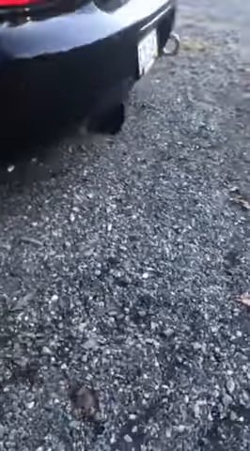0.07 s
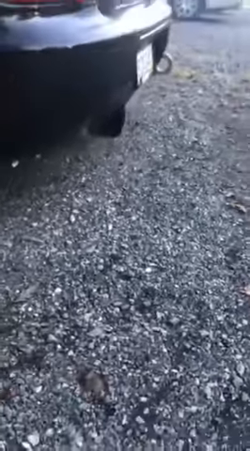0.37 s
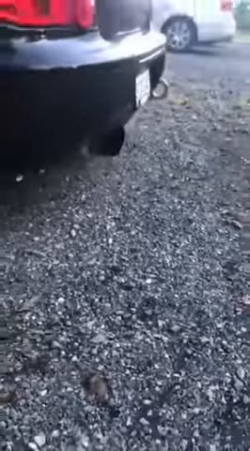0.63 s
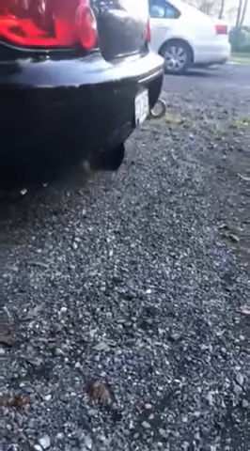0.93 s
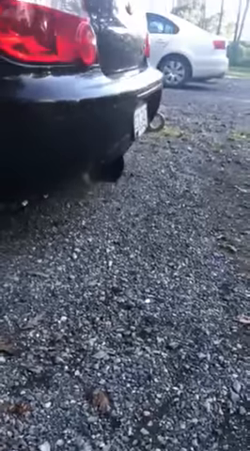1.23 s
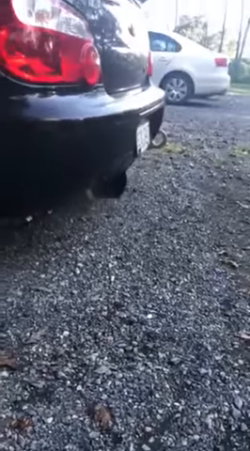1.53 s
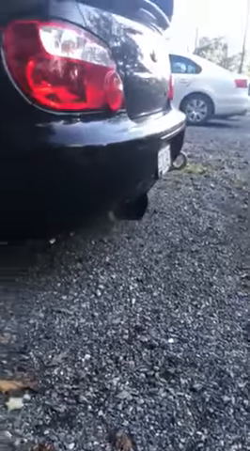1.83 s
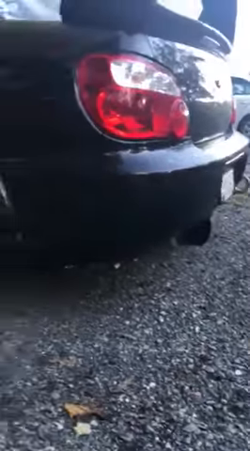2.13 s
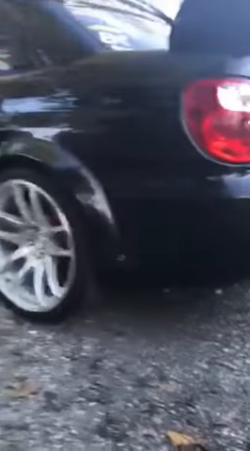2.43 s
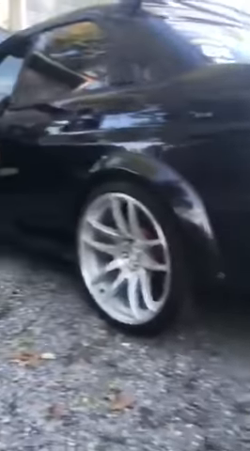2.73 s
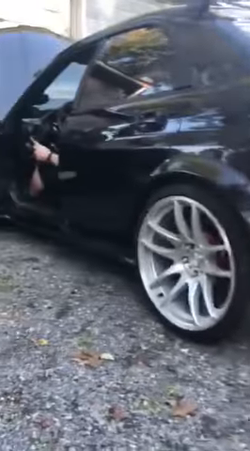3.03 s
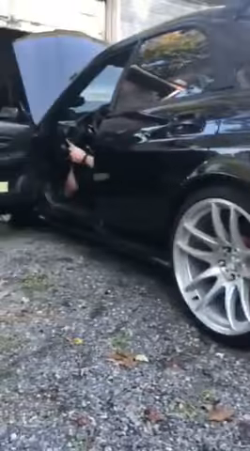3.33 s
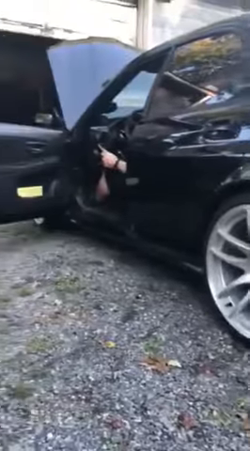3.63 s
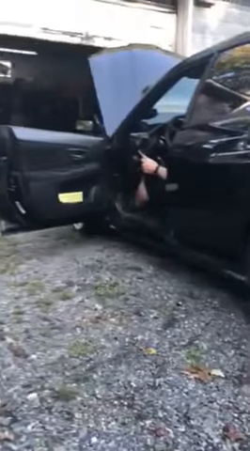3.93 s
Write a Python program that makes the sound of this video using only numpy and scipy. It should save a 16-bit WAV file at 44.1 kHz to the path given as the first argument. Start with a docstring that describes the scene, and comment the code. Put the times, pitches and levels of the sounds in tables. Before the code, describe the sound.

A car engine idles with a low, slightly uneven exhaust rumble and small pops.

```python
"""A four-cylinder car idles outdoors over a steady engine whirr. At first we stand behind the tailpipe:
each firing thumps through the exhaust with a puff of hiss, and the pipe spits and pops.
From 1.6 s we walk round the car. Soon the idle gets rougher: weak or late firings make it stumble,
and the silencer gives low gulps. From about 2.7 s we listen beside the rear wheel,
where the hiss is softer and the stumbles, spits and a few quieter pops carry on."""
import sys
import numpy as np
from scipy import signal
from scipy.fft import rfft, irfft, next_fast_len
from scipy.io import wavfile

SR = 44100
rng = np.random.default_rng(int(sys.argv[2]) if len(sys.argv) > 2 else 0)


def wrap_up_sound(samples):
    """Save the sound to the file named by the first command line argument, as 16-bit audio."""
    columns = np.atleast_2d(samples).T
    # keep every value between -1 and 1, then stretch to whole-number steps
    tamed = np.clip(columns, -1, 1)
    steps = np.round(tamed * 32767).astype(np.int16)
    wavfile.write(sys.argv[1], SR, steps)


N = 176400

# How fast the engine fires: time_s, rate_hz
FIRING_RATE = [(0.0, 44.39), (0.22, 45.12), (0.42, 44.57), (0.68, 45.86), (0.95, 45.3), (1.25, 44.26),
               (1.55, 44.88), (1.78, 44.28), (1.98, 42.41), (2.2, 43.86), (2.38, 43.17), (2.5, 42.91),
               (2.75, 43.2), (3.0, 42.47), (3.2, 42.46), (3.42, 43.48), (3.6, 43.5), (4.0, 43.6)]
# The four cylinders in firing order: strength_db, late_s, extra_hiss_db
CYLINDERS = [(.1, .0001, 2.5), (-.5, .00064, 2.6), (.7, -.0003, 4.6), (-.1, -.0004, 5.3)]
# Uneven firings: time_s, strength_change_db, late_s
STUMBLES = [(1.814, -8, 0.018), (1.86, -1, -.001), (1.929, -8, -0.0061), (1.976, -12, 0.025),
            (1.999, -0.5, -.0015), (2.392, 1.5, -.0012), (2.415, -8, -.002), (2.438, -2, .0005),
            (2.786, -5, .0005), (2.833, -2.5, .001), (2.856, 0.5, -.002), (2.88, -1.5, -.0005),
            (2.95, 4, -.0005), (2.997, -5.5, .0005), (3.02, -4.5, .0015), (3.067, -8.5, .0005),
            (3.138, 3, -.0005), (3.209, -4, .002), (3.487, 0, 0.025), (3.51, -9.5, -.002),
            (3.533, 1.5, .001), (3.671, -7, .0003)]
# Random variation grows as the idle gets rougher: time_s, multiplier
ROUGHNESS = [(1.7, 1), (2.8, 1.9)]
# Volume controls for three layers: time_s, exhaust_gain_db, gas_gain_db, whirr_gain_db
LAYER_GAINS = [(0, -14, -42.5, -26), (.4, -15, -47.5, -27.5), (.9, -15, -48, -28.5), (1.6, -17, -50, -29.5),
               (2.4, -15.5, -49, -31), (3.1, -17, -51.5, -31.5), (4, -18, -53.5, -30.5)]

# Tone of the engine noise at the start, behind the car and beside it: pitch_hz, gain_db
WHIRR_START = [(25, 9), (120, 29.5), (300, 12), (480, 4), (700, 1), (1000, -5), (1450, -10), (2000, -8.5),
               (2700, -21.5), (3400, -18), (5000, -24.5), (9000, -26)]
WHIRR_BEHIND = [(25, 17), (120, 22.5), (300, 10.5), (520, -3.5), (630, -3.5), (850, -9.5), (1200, -11),
                (1450, -6), (1680, -5), (1900, -13.5), (2300, -19), (2800, -18), (3400, -29), (4200, -23.5),
                (5000, -31), (9000, -33.5)]
WHIRR_BESIDE = [(25, 8.5), (120, 30), (300, 12.5), (520, 3), (650, 2), (850, -0.5), (1200, -7), (1500, -3),
                (1900, -11.5), (2700, -16), (3400, -26), (5000, -24.5), (9000, -29.5)]
# Dips in the tone of the whirr: pitch_hz, width_hz, depth_db
WHIRR_DIPS = [(620, 50, -9), (1910, 60, -7)]
# The whirr thins out in the bass: pitch_hz, gain_db
BASS_CUT = [(30, -14), (90, -10), (130, -10), (200, -5.5), (450, 0)]
# Engine ringing, whose two levels are weighted in whirr(): pitch_hz, width_hz, behind_db, beside_db
ENGINE_RINGS = [(537, 10, -19, -17), (1398, 7, -17.5, -22), (1460, 14, -23, -16.5), (1535, 8, -20.5, -22),
                (1625, 8, -18.5, -28)]
# Lowest pitch that the ground echo partly cancels: time_s, pitch_hz
GROUND_NOTCH = [(0, 484), (.3, 550), (.6, 630), (2.4, 642), (4, 726)]
# Clean overtones of the firing rate: multiple, level_db
OVERTONES = [(7, -42), (9, -38), (12, -46)]
# Fade added to those overtones: time_s, gain_db
OVERTONE_FADE = [(0, -2), (1.2, -1), (1.8, -7.5), (2.5, -14)]
# Tone of the light tick between firings: pitch_hz, gain_db
TICK_TONE = [(1200, -24.5), (2000, -2.5), (2500, -6), (3000, -4), (3500, -22), (9000, -25.5)]
# Loudness of the ticking: time_s, level_db
TICK_LEVEL = [(0, -50), (1.2, -50), (2.5, -57), (4, -62)]

# Silencer gulps, gas spits and pipe pops: start_s, strength_db
GULPS = [(1.93, -14), (1.97, -13), (2.41, -23), (3.205, -15.5), (3.489, -10.5), (3.519, -13.5)]
SPITS = [(0.0562, -26), (0.1448, -25), (0.1661, -24), (0.2547, -25), (0.2786, -25), (0.3896, -26),
         (0.4582, -26), (0.501, -25), (0.5227, -26), (0.6984, -27), (0.7864, -26), (0.8514, -22),
         (0.8739, -25), (1.2307, -27), (1.4097, -26), (1.4993, -26), (1.7456, -28), (1.8369, -28),
         (1.8592, -28), (1.9072, -28), (1.9522, -27), (2.1159, -27), (2.277, -27), (2.347, -29),
         (2.3683, -27), (2.4637, -29), (2.4844, -27), (2.764, -28), (2.8795, -30), (2.9272, -23),
         (2.9496, -32), (2.9742, -32), (3.1618, -33), (3.5551, -31)]
POPS = [(0.0345, -15), (0.3215, -19), (0.39, -18), (0.965, -25), (1.1395, -16.5), (1.41, -15.5),
        (2.838, -25), (3.373, -26), (3.764, -24)]
# Tone of a spit, its bright tail and the tail of a pop: pitch_hz, gain_db
SPIT_TONE = [(800, -14), (1900, 6), (2300, 15.5), (2900, 13.5), (3400, -6), (4200, 4), (5000, -15),
             (6800, -14), (8500, -7.5), (9500, -20)]
SIZZLE_TONE = [(3000, -18), (4300, -2), (6300, -3.5), (8800, -5)]
POP_TAIL_TONE = [(150, -26.5), (400, -15), (600, 0.5), (900, -1), (1300, -14), (2000, -9), (3500, -17.5),
                 (9000, -23)]
# Tone of the low, middle and high gas noise of a firing: pitch_hz, gain_db
CHUFF_TONE = [(100, -7), (220, 3), (330, 4.5), (450, -11.5), (620, -30.5), (1000, -26.5), (2000, -34),
              (5000, -66.5)]
RASP_TONE = [(400, -28), (800, 5.5), (1500, 9), (1900, -21), (2300, 7), (2900, 5.5), (3400, -13.5),
             (5000, -17.5), (9000, -29.5)]
HISS_TONE = [(1500, -30), (3000, 11.5), (4000, 4), (5000, 1), (6800, 5), (8000, 3), (8700, 7.5),
             (9500, -34.5)]
# Tone of the throaty edge of a firing: pitch_hz, gain_db
BARK_TONE = [(120, -43), (220, 1), (265, 1.5), (312, -1), (355, -5.5), (398, -6), (445, -9.5), (485, -17),
             (532, -10.5), (610, -27.5), (1200, -33.5), (4000, -79)]
# Tone of the exhaust thump from behind and from the side: pitch_hz, gain_db
PIPE_BEHIND = [(5, -71.5), (25, -19), (44, -5), (60, -21), (88, 4.5), (134, 6.5), (178, 4), (222, -27.5),
               (266, -33), (350, -24.5), (620, -45), (4000, -81.5)]
PIPE_BESIDE = [(5, -61), (25, -49.5), (44, -11.5), (62, -15.5), (86, 4), (130, -1.5), (174, 0.5),
               (218, -21), (262, -19), (350, -39.5), (620, -57.5), (4000, -78.5)]

WALK_S = (1.6, 2.73)  # the listener moves from behind the car to its side
WHIRR_BLEND_S = (0.101, 0.601, 1.9, 3.2)  # tone leaves "start", reaches "behind", leaves, reaches "beside"
FIRST_FIRING = .43  # wait before the first firing, as a share of the gap between firings


def amp(db):
    """Turn decibels into a multiplier."""
    return 10 ** (np.asarray(db) / 20)


def unit(x):
    """Scale a sound to an average (rms) level of 1."""
    return x / np.sqrt(np.mean(x ** 2) + 1e-20)


def curves(rows):
    """One value per sample for each column after the time."""
    s, *cols = np.transpose(rows)
    return [np.interp(np.arange(N) / SR, s, c) for c in cols]


def gain(tone, hz):
    """Look up a tone table's multiplier at these pitches."""
    pitch_hz, db = np.transpose(tone)
    return amp(np.interp(np.log(hz + 1), np.log(pitch_hz + 1), db))


def filtered(x, response):
    """Turn each pitch in x up or down by response(hz)."""
    size = 2 * next_fast_len(N)
    return irfft(rfft(x, size) * response(np.fft.rfftfreq(size, 1 / SR)), size)[:N]


def rung(x, tone):
    """Let x ring a hollow body with this tone."""
    def response(hz):
        cepstrum = irfft(np.log(gain(tone, hz)))
        # Folding it in half makes the ringing come after each hit, never before.
        cepstrum[1:len(cepstrum) // 2] *= 2
        cepstrum[len(cepstrum) // 2 + 1:] = 0
        return np.exp(rfft(cepstrum))
    return filtered(x, response)


def noise(tone):
    """Steady noise with this tone, at level 1."""
    return unit(filtered(rng.standard_normal(N), lambda hz: gain(tone, hz)))


def impulses(times, db):
    """A one-sample click at each time."""
    return np.bincount(np.clip(np.round(times * SR).astype(int), 0, N), amp(db), N + 1)[:N]


def placed(shape, times, db):
    """A copy of the shape at each time, peaking at db."""
    return signal.fftconvolve(impulses(times, db), shape / abs(shape).max())[:N]


def swell(t, attack_s, decay_s):
    """A loudness shape that rises and dies away."""
    return (1 - np.exp(-t / attack_s)) * np.exp(-t / decay_s)


def bursts(times, db, tone, attack_s, decay_s):
    """A short burst of noise at each time."""
    t = np.arange(SR // 8) / SR
    return placed(swell(t, attack_s, decay_s), times, db) * noise(tone)


def puffs(times, db, tone, scatter_db, delay_s, attack_s, decay_s):
    """A burst of noise with every firing, each of its own size."""
    sizes_db = db + scatter_db * rng.uniform(-1, 1, len(db))
    return unit(bursts(times + delay_s, sizes_db, tone, attack_s, decay_s))


def beside():
    """How far the walk has got: 0 behind the car, 1 at its side."""
    return np.clip((np.arange(N) / SR - WALK_S[0]) / (WALK_S[1] - WALK_S[0]), 0, 1)


def with_ground_echo(x, strength=.45, cutoff_hz=2500):
    """A duller echo off the gravel makes the sound hollow."""
    n = np.arange(N)
    notch_hz, = curves(GROUND_NOTCH)
    delay_samples = SR / (2 * notch_hz)
    dull = filtered(x, lambda hz: 1 / (1 + (hz / cutoff_hz) ** 4))
    return x + strength * np.interp(n - delay_samples, n, dull)


def whirr():
    """The running engine makes steady noise and rings at a few pitches; the tone shifts as we move."""
    def blend(shares):
        return np.sqrt(np.interp(np.arange(N) / SR, WHIRR_BLEND_S, shares))

    def dips(hz):
        return amp(sum(db * np.exp(-((hz - pitch) / width) ** 2) for pitch, width, db in WHIRR_DIPS))

    later = blend([0, 1, 1, 0]) * noise(WHIRR_BEHIND) + blend([0, 0, 0, 1]) * noise(WHIRR_BESIDE)
    wash = blend([1, 0, 0, 0]) * noise(WHIRR_START) + filtered(later, dips)
    sound = amp(14.5) * filtered(unit(with_ground_echo(wash)), lambda hz: gain(BASS_CUT, hz))
    side = beside()
    for pitch, width, behind_db, beside_db in ENGINE_RINGS:
        ring = filtered(rng.standard_normal(N), lambda hz: 1 / (1 + ((hz - pitch) / width) ** 2))
        sound += amp((1.5 - side) * behind_db + side * beside_db) * unit(ring)
    return sound


def hum():
    """A few overtones follow the firing rate and fade once the pipe points away."""
    rate_hz, = curves(FIRING_RATE)
    cycles = np.cumsum(rate_hz) / SR - FIRST_FIRING
    fade_db, = curves(OVERTONE_FADE)
    return np.sqrt(2) * sum(amp(db + fade_db) * np.sin(2 * np.pi * k * cycles) for k, db in OVERTONES)


def ticks(times, db):
    """A light tick, likely a valve, falls between the firings."""
    level_db, = curves(TICK_LEVEL)
    ticking = puffs(times, db, TICK_TONE, scatter_db=2.5, delay_s=.0116, attack_s=.0005, decay_s=.0012)
    return amp(level_db) * ticking


def gulps(pitch_hz=78):
    """The silencer's lowest note rings on when the rhythm breaks."""
    t = np.arange(SR // 6) / SR
    ring = np.sin(2 * np.pi * pitch_hz * t) * swell(t, attack_s=.012, decay_s=.016)
    return placed(ring, *np.transpose(GULPS))


def spits():
    """Sharp puffs of gas leave the mouth of the pipe, each with a short bright tail."""
    times, db = np.transpose(SPITS)
    snap = bursts(times, db, SPIT_TONE, attack_s=.00054, decay_s=.003)
    sizzle = bursts(times, db, SIZZLE_TONE, attack_s=.0015, decay_s=.004)
    return amp(-8.5) * snap + amp(-12.5) * sizzle


def pops(start_hz=1868, end_hz=365, fall_s=.00133):
    """Small bangs leave the pipe as quick falling chirps with a short noisy tail."""
    times, db = np.transpose(POPS)
    t = np.arange(SR // 20) / SR
    pitch_hz = end_hz + (start_hz - end_hz) * np.exp(-t / fall_s)
    chirp = np.sin(2 * np.pi * np.cumsum(pitch_hz) / SR) * swell(t, attack_s=.0002, decay_s=.0077)
    tail = bursts(times, db, POP_TAIL_TONE, attack_s=.011, decay_s=.012)
    return placed(chirp, times, db) + amp(-18) * tail


def gas(times, db, hiss_db):
    """Each firing lets out a puff of gas: a quick rasp and a higher hiss."""
    rasp = puffs(times, db, RASP_TONE, scatter_db=2.5, delay_s=.0004, attack_s=.0006, decay_s=.002)
    hiss = puffs(times, hiss_db, HISS_TONE, scatter_db=5, delay_s=.0015, attack_s=.0015, decay_s=.0038)
    return amp(3) * rasp + amp(-3) * hiss


def firings(scatter_db=.45, scatter_s=.00009):
    """The cylinders fire in turn, a bit unevenly. Gives each firing's time, strength and hiss strength."""
    rate_hz, = curves(FIRING_RATE)
    cycles = np.cumsum(rate_hz) / SR
    count = np.arange(int(cycles[-1]))
    db, late_s, extra_hiss_db = np.array(CYLINDERS)[count % len(CYLINDERS)].T
    times = np.interp(count + FIRST_FIRING, cycles, np.arange(N) / SR)
    roughness = np.interp(times, *np.transpose(ROUGHNESS))
    chance = rng.standard_normal((len(count), 2)) * roughness[:, None]
    db = db + scatter_db * chance[:, 0]
    for time_s, change_db, shift_s in STUMBLES:
        nearest = np.argmin(abs(times - time_s))
        db[nearest] += change_db
        late_s[nearest] += shift_s
    return times + late_s + scatter_s * chance[:, 1], db, db + extra_hiss_db


def bark(times, db, scatter_db=3, delay_s=.002):
    """The front of each pulse rings the pipe's higher notes, less evenly as the idle gets rougher."""
    roughness = np.interp(times, *np.transpose(ROUGHNESS))
    sizes_db = db + scatter_db * roughness * rng.uniform(-1, 1, len(db))
    return unit(rung(impulses(times + delay_s, sizes_db), BARK_TONE))


def thump(times, db, delay_s=.0032):
    """Pressure pulses ring the exhaust; its tone changes on the way round the car."""
    pulses, side = impulses(times + delay_s, db), beside()
    return (1 - side) * unit(rung(pulses, PIPE_BEHIND)) + side * unit(rung(pulses, PIPE_BESIDE))


def exhaust(times, db):
    """Each firing leaves the pipe as a deep thump, a throaty bark and a low chuff of gas."""
    chuff = puffs(times, db, CHUFF_TONE, scatter_db=6, delay_s=.0021, attack_s=.0052, decay_s=.0019)
    return amp(1.5) * thump(times, db) + amp(-17) * bark(times, db) + amp(-28) * chuff


def scene():
    """Add the engine background, the tailpipe's odd noises and the firings into one channel."""
    times, db, hiss_db = firings()
    exhaust_gain, gas_gain, whirr_gain = amp(curves(LAYER_GAINS))
    background = whirr_gain * whirr() + hum() + ticks(times, db)
    odd_noises = gulps() + spits() + pops()
    beat = gas_gain * gas(times, db, hiss_db) + exhaust_gain * exhaust(times, db)
    return (background + odd_noises + beat)[None]


def record(dry):
    """Cut away the very highest treble."""
    top_hz = 9080
    return filtered(dry[0], lambda hz: 1 / np.sqrt(1 + (hz / top_hz) ** 120))[None]


dry = scene()
out = record(dry)
wrap_up_sound(out)
```